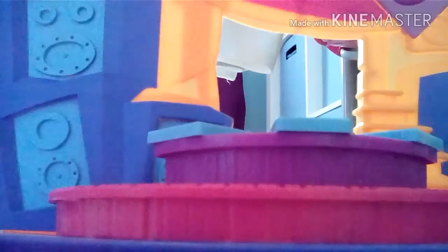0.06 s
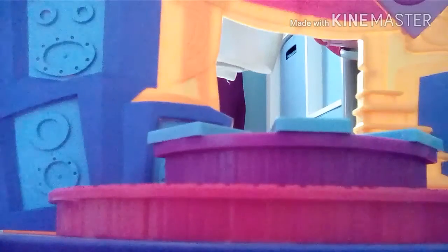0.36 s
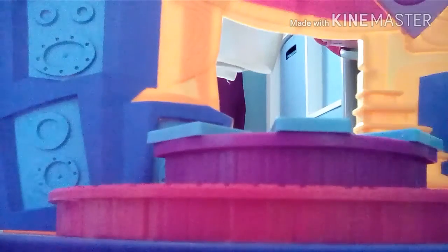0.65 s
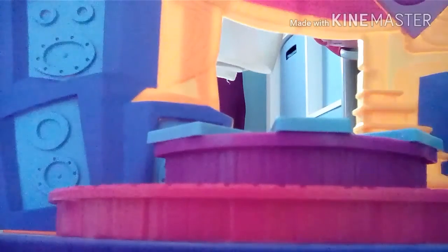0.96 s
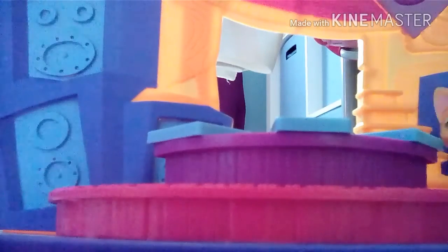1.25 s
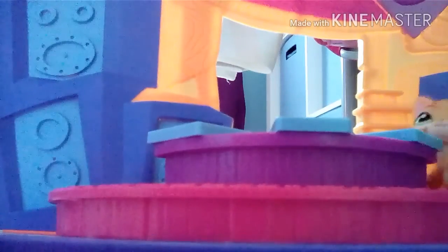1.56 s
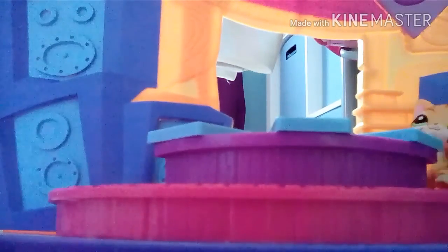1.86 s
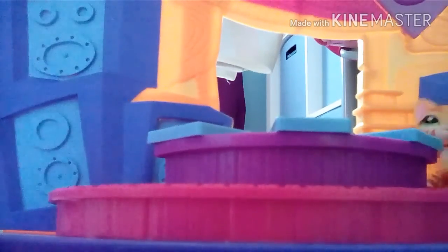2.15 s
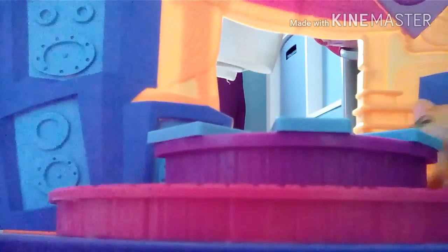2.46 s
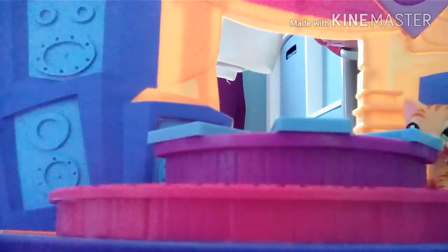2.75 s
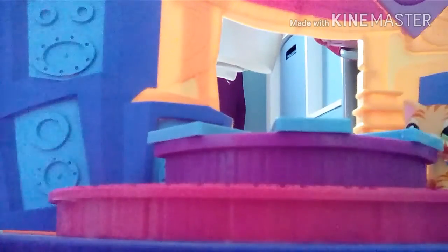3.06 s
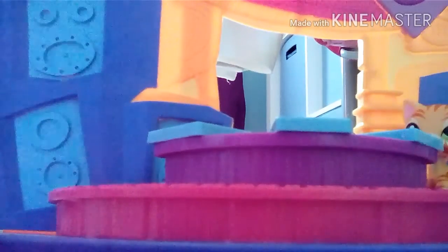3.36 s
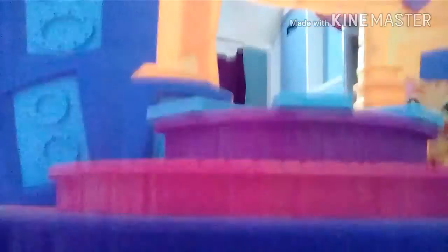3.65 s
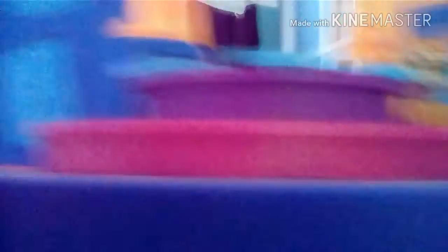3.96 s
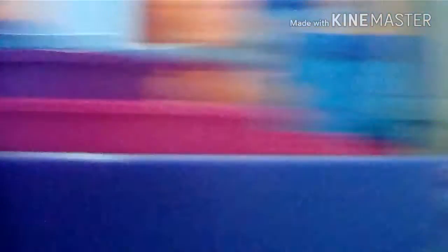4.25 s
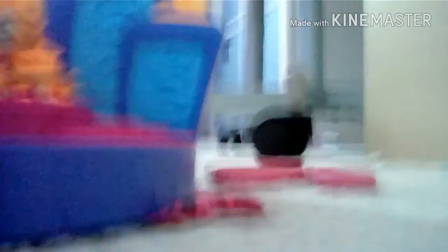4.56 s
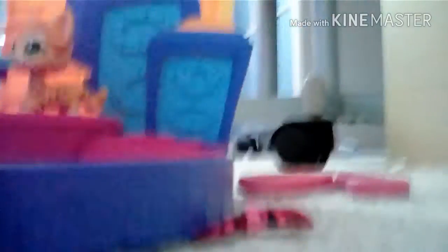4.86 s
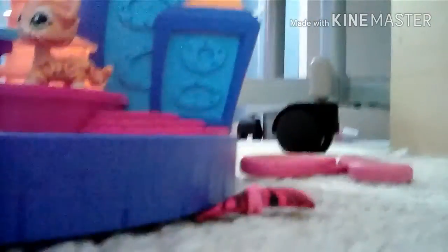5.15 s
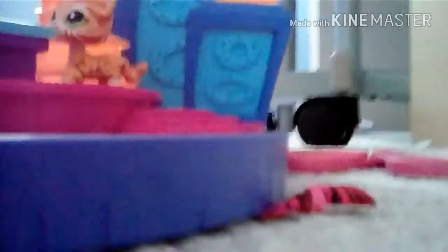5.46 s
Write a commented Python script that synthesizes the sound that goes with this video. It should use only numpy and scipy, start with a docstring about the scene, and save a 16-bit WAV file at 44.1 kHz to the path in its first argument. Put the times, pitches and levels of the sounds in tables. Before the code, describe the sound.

A small plastic figure clatters onto a hollow playset right at the start, close to the microphone in a quiet room, and drags briefly. From about 0.8 to 1.7 seconds come more light clicks, taps and scrapes that ring the thin walls, with a dull bump near 0.9 and a tiny rubbing groan around 1.5. Fingers then brush softly over the plastic, with another tap near 2.5 and a soft thump at 3. From about 3.5 seconds the camera is handled, much louder: a quick run of knocks on its case, a short judder, and a gritty carpet rub that swells from 3.9 to 4.5. At 4.5 the case strikes the playset with a hard clack, the loudest sound, briefly overloading the microphone. Three heavy, dull thuds follow at about 4.75, 4.95 and 5.3 seconds, with fainter rubbing between and after them.

```python
"""Hollow plastic knocks, drags and scrapes up close, then carpet rubbing and dull, heavy bumps.
A small figure strikes and slides on a playset, ringing its thin walls; fingers brush the plastic.
Then a camera is picked up and pushed over the carpet: its case rubs, judders and thuds,
and the hardest blow overloads the microphone."""
import sys
import numpy as np
from scipy import signal
from scipy.fft import rfft, irfft
from scipy.io import wavfile
from scipy.ndimage import uniform_filter1d

SR = 44100
rng = np.random.default_rng(int(sys.argv[2]) if len(sys.argv) > 2 else 0)


def persist_wave(psi):
    """Save psi, clipped to +-1, as 16-bit WAV."""
    counts = np.round(np.clip(psi, -1, 1) * 32767).astype(np.int16)
    wavfile.write(sys.argv[1], SR, np.atleast_2d(counts).T)


N = 247401

# playset wall modes: (frequency [Hz], level [dB])
WALL_MODES = [(302, -1.5), (350, -5.5), (484, 2.5), (532, 0), (602, -3), (662, 3), (805, -0.5), (879, -2),
              (938, 2.5), (1237, -7.5), (1360, -4), (1400, -2), (1555, -9), (2230, -11.5)]
# modes of the stiff little figure: (frequency [Hz])
FIGURE_MODES_HZ = [3250, 3450, 4320, 5450, 5560, 6350, 7050]
# camera case modes: (frequency [Hz], level [dB], t60 at pitch factor 1 [s])
CASE_MODES = [(178.6, 2.5, 0.052), (310, 3, 0.033), (545, -11.5, 0.034), (1600, -22.5, 0.01)]
# friction of case on carpet: (frequency [Hz], density [dB])
CARPET_SPECTRUM = [(30, -17), (120, 8.5), (400, 9), (780, 7), (1140, 2), (2000, -4), (3200, -10),
                   (4300, -27.5), (7300, -28.5), (9300, -35.5), (15000, -66.5)]


def amp(db):
    """Decibels to gain."""
    return 10 ** (np.asarray(db) / 20)


def unit_rms(x):
    """Scales to rms 1."""
    return x / np.sqrt(np.mean(x ** 2) + 1e-20)


def gain_at(spectrum, hz):
    """Gain of a (Hz, dB) table, interpolated over log frequency."""
    table_hz, db = np.transpose(spectrum)
    return amp(np.interp(np.log(hz + 1), np.log(table_hz + 1), db))


def add(mix, start_s, sound):
    """Mixes a sound in at start_s."""
    part = mix[max(round(start_s * SR), 0):][:len(sound)]
    part += sound[:len(part)]


def tinted(x, spectrum, size=4096):
    """Minimum-phase filter of energy 1, shaped by a (Hz, dB) table."""
    log_gain = np.log(gain_at(spectrum, abs(np.fft.fftfreq(size, 1 / SR))))
    impulse = np.fft.ifft(np.exp(np.conj(signal.hilbert(log_gain)))).real[:size // 2]
    return signal.fftconvolve(x, impulse / np.linalg.norm(impulse))[:len(x)]


def wander(cutoff_hz, size=2 ** 14, rate_hz=2048):
    """Slow random drift of rms 1."""
    hz = np.fft.rfftfreq(size, 1 / rate_hz)
    slow = irfft(rfft(rng.standard_normal(size)) / (1 + (hz / cutoff_hz) ** 4))
    return unit_rms(np.interp(np.arange(N) / SR, np.arange(size) / rate_hz, slow))


def ring(t, early_t60_s, late_db, late_t60_s):
    """Dense modes as decaying noise: most die at once, a few linger."""
    decay = amp(-60 * t / early_t60_s) + amp(late_db - 60 * t / late_t60_s)
    return rng.choice([-1., 1.], len(t)) * decay


def stroke_gains(strokes, t, attack_share, release_s):
    """Body and hiss gains: each stroke gathers speed, swells or eases, then dies away."""
    start_s, length_s, body_db, hiss_db, swell_db = np.transpose(strokes)[:, :, None]
    age_s = t - start_s
    attack = np.sin(np.pi / 2 * np.clip(age_s / (attack_share * length_s), 0, 1)) ** 2
    release = np.exp(-np.maximum(age_s - length_s, 0) / release_s)
    swell = amp(swell_db * (np.clip(age_s / length_s, 0, 1) - .5))
    return [np.linalg.norm(attack * release * swell * amp(db), axis=0) for db in (body_db, hiss_db)]


def friction(gains, spectrum, peaks, *, body_db, hiss_db, grain_db, fixed_ripple_db, local_ripple_db,
             uneven_db, uneven_hz, travel_hz, peak_spread_db=0, places=4, split_hz=4000):
    """Countless small catches, unevenly pressed; the contact roams places that favour different modes."""
    hz = np.fft.rfftfreq(N, 1 / SR)

    def ripple(depth_db, bins):
        """Narrow random peaks of many small modes."""
        return amp(depth_db * unit_rms(uniform_filter1d(rng.standard_normal(len(hz)), bins)))

    catches = rfft(rng.standard_normal(N) * amp(grain_db * wander(cutoff_hz=149)))
    catches *= gain_at(spectrum, hz) * ripple(fixed_ripple_db, bins=450)
    nearness = np.exp([2 * wander(travel_hz) for _ in range(places)])
    sound = np.zeros(N)
    for share in nearness / nearness.sum(0):
        local = catches * ripple(local_ripple_db, bins=500)
        resonance = 1
        for peak_hz, width_hz, db in peaks:
            height = amp(db + peak_spread_db * rng.uniform(-0.58, 1))
            resonance += height / (1 + ((hz - peak_hz) / (width_hz / 2)) ** 2)
        sound += share * unit_rms(irfft(local * resonance, N))
    treble = irfft(rfft(sound) / (1 + (split_hz / (hz + 1)) ** 6), N)
    body = unit_rms(sound - treble) * gains[0] * amp(body_db)
    hiss = unit_rms(treble) * gains[1] * amp(hiss_db)
    return amp(uneven_db * wander(uneven_hz)) * (body + hiss)


def room():
    """Faint, steady, bass-heavy noise."""
    # quiet room: (frequency [Hz], density [dB])
    spectrum = [(30, -3), (100, 10), (400, -2.5), (1500, -12.5), (6500, -19.5), (10000, -30.5),
                (15000, -30.5)]
    return amp(-70) * unit_rms(tinted(rng.standard_normal(N), spectrum))


def drag_gains(t):
    """Body and hiss gains as the figure is pressed along."""
    # strokes on plastic: (start [s], length [s], body [dB], hiss [dB], swell [dB])
    strokes = [(0.001, 0.26, -48, -64, -17.5), (0.25, 0.14, -55, -67.5, 8.5), (0.62, 0.056, -65, -74, -9),
               (0.792, 0.12, -54, -66, 0), (0.978, 0.21, -48, -75, -11.5), (1.215, 0.11, -53.5, -71.5, -2),
               (1.41, 0.33, -51, -66.5, -16.5), (1.782, 0.34, -53, -79.5, 0.5),
               (2.43, 0.31, -54.5, -75.5, 0), (2.927, 0.37, -60.5, -77.5, -2.5)]
    return stroke_gains(strokes, t, attack_share=0.087, release_s=0.055)


def figure_drag(t):
    """Sliding stirs the same wall and figure modes as knocking."""
    # plastic on plastic: (frequency [Hz], density [dB])
    spectrum = [(30, -19.5), (130, -2), (260, 0.5), (600, -10.5), (830, -8.5), (1100, -23), (1400, -14),
                (2600, -26), (3300, -22), (4000, -29.5), (6300, -22), (8000, -32.5), (13000, -55.5)]
    peaks = [(hz, 35, db + 1) for hz, db in WALL_MODES] + [(hz, 160, -2) for hz in FIGURE_MODES_HZ]
    return friction(drag_gains(t), spectrum, peaks, body_db=0.5, hiss_db=-1.5, grain_db=2.5,
                    fixed_ripple_db=2, local_ripple_db=5, uneven_db=2, uneven_hz=60, travel_hz=8.5,
                    peak_spread_db=5)


def playset_ring(t):
    """The struck hollow body; the mix of wall modes depends on where the blow lands."""
    # short-lived playset modes: (frequency [Hz], density [dB])
    spectrum = [(40, -39), (200, -16.5), (320, -1.5), (550, 3), (950, -1), (1400, -4), (1900, -15),
                (3200, -33.5), (6000, -38), (14000, -73)]
    hz, db = np.transpose(WALL_MODES)[:, :, None]
    t60_s = 0.15 * (500 / hz) ** .3
    place = rng.choice([-1., 1.], hz.shape) * amp(rng.uniform(-6, 6, hz.shape))
    detune = 1 + 0.0073 * rng.standard_normal(hz.shape)  # from the pressing hand
    walls = (place * amp(db - 60 * t / t60_s) * np.sin(2 * np.pi * hz * detune * t)).sum(0)
    clatter = tinted(ring(t, early_t60_s=0.06, late_db=-27, late_t60_s=0.22), spectrum)
    thump = tinted(1. * (t == 0), spectrum)
    body = sum(amp(mix_db) * part / np.std(part[t < .02])
               for mix_db, part in [(-0.5, walls), (-2, clatter), (-7, thump)])
    return signal.lfilter(*signal.butter(4, 235, "high", fs=SR), body)  # the ring carries little bass


def contact_snap(t, start_s, level_db, hard_db=-22, mix_db=-8):
    """Plastic meets plastic: hard blows snap brightly, light ones scuff longer and duller."""
    # snap: (frequency [Hz], density [dB])
    spectrum = [(100, -23), (800, -5.5), (2000, 1.5), (3300, 2), (4500, -3.5), (6800, 1.5), (8500, -8.5),
                (11000, -17.5), (15500, -27.5)]
    # dulling as the figure moves behind the playset: (time [s], cutoff at hard_db [Hz])
    cutoffs = [(0, 13200), (1.42, 12430), (1.55, 8400), (2.4, 7750)]
    hz = np.array(FIGURE_MODES_HZ)[:, None]
    figure = (rng.standard_normal(hz.shape) * np.sin(2 * np.pi * hz * t)).sum(0)
    figure *= amp(-25 - 60 * t / 0.055)
    skid = 0.5 + np.clip((hard_db - level_db) / 26, 0, 2)  # stretches the contact
    contact = ring(t, early_t60_s=0.021 * skid, late_db=-28, late_t60_s=0.18) + figure * skid
    contact *= 1 - np.exp(-t / (0.00066 * skid))
    loose_parts = rng.standard_normal(len(t)) * (rng.random(len(t)) < 300 / SR)
    contact += loose_parts * amp(9 - 60 * t / 0.07)
    contact[0] += 1 / skid ** 2
    cutoff_hz = np.interp(start_s, *np.transpose(cutoffs)) * amp((level_db - hard_db) / 10)
    lowpass = signal.butter(4, np.clip(cutoff_hz, 1000, SR / 2.2), fs=SR)
    snap = signal.lfilter(*lowpass, tinted(contact, spectrum))
    return amp(level_db + mix_db) * snap / np.std(snap[t < .003]) / np.sqrt(skid)


def playset_hits(hits):
    """Each hit rings the body and snaps at the contact."""
    out, t = np.zeros(N), np.arange(SR // 3) / SR
    for start_s, snap_db, ring_db in hits:
        add(out, start_s + 0.00081, amp(ring_db) * playset_ring(t) + contact_snap(t, start_s, snap_db))
    return out


def figure_knocks():
    """The figure lands; unless held down it rocks onto its other foot, more softly."""
    # landings: (time [s], relative snap [dB], ring [dB], rebound delay [s]; 0 = held down)
    knocks = [(0.0224, -36, -40, 0.0026), (0.0343, -10.5, -15.5, 0.017), (0.0405, -22.5, -20, 0.00052),
              (0.0644, -27.5, -26.5, 0.001), (0.1008, -31, -24, 0.0069), (0.1181, -17.5, -21, 0.023),
              (0.186, -62, -56, 0.0015), (0.2705, -33, -31, 0), (0.2955, -31.5, -27, 0.029),
              (0.7736, -49, -45, 0), (0.7805, -47.5, -35.5, 0.004), (0.797, -48.5, -41, 0.0018),
              (0.827, -66, -48, 0.0039), (0.9477, -25, -40, 0.0017), (0.9703, -25.5, -42.5, 0.0049),
              (0.9809, -24.5, -26, 0.014), (1.0179, -34, -46, 0), (1.031, -55, -54, 0),
              (1.044, -32.5, -43, 0), (1.076, -46, -44, 0.037), (1.1015, -35.5, -32.5, 0.0054),
              (1.1251, -40.5, -46, 0.014), (1.2749, -51, -46, 0.00021), (1.4218, -25, -33, 0.01),
              (1.4524, -45, -52, 0), (1.480, -58, -47, 0.0015), (1.5277, -38.5, -45.5, 0.00033),
              (1.616, -51, -49, 0.0032), (1.636, -41, -46, 0.016), (1.6706, -42.5, -44, 0.038),
              (1.71, -47, -65, 0.0016), (1.73, -45, -51, 0.0022), (1.7877, -57, -45, 0.024),
              (1.925, -57, -69, 0.025), (2.005, -57, -47, 0.0037), (2.104, -58, -67, 0.017),
              (2.4345, -44, -51.5, 0), (2.452, -51.5, -49, 0.009), (2.5437, -29.5, -38, 0.024),
              (2.6332, -69, -50, 0.0037)]
    rebounds = [(start_s + delay_s, snap_db - 12, ring_db - 8)
                for start_s, snap_db, ring_db, delay_s in knocks if delay_s > 0]
    return playset_hits([knock[:3] for knock in knocks] + rebounds)


def figure_snags(rate_hz=48, pressed_db=-53, smooth_from_s=2.2):
    """Pressed and dragged, the figure catches on small ridges until it reaches smooth plastic."""
    beats_s = np.arange(0, smooth_from_s, 1 / rate_hz)
    lag, size = rng.random((len(beats_s), 2)).T
    times_s, size_db = beats_s + lag / rate_hz, 6 * size - 3
    body_db, hiss_db = 20 * np.log10(np.add(drag_gains(times_s), 1e-9))
    hits = np.transpose([times_s, hiss_db + 11 + size_db, body_db + size_db])
    return playset_hits(hits[body_db > pressed_db])


def edge_scrapes():
    """A skidding edge drives one high resonance that swells quickly and fades."""
    # skids: (start [s], length [s], level [dB], centre [Hz], width [Hz])
    skids = [(0.77, 0.021, -57.5, 7460, 1806), (0.792, 0.063, -54.5, 6700, 2652),
             (1.236, 0.061, -69, 7050, 400), (3.826, 0.0051, -46, 6400, 2160),
             (4.012, 0.072, -48, 5150, 515)]
    out, hz = np.zeros(N), np.fft.rfftfreq(SR, 1 / SR)
    for start_s, length_s, db, centre_hz, width_hz in skids:
        band = 1 / (1 + ((hz - centre_hz) / (width_hz / 2)) ** 4)
        noise = unit_rms(irfft(rfft(rng.standard_normal(SR)) * band, SR))
        progress = np.linspace(0, 1, int(length_s * SR))
        add(out, start_s, amp(db) * noise[:len(progress)] * np.sin(np.pi * np.sqrt(progress)))
    return out


def camera_hits(hits, modes, leak_hz=85):
    """A force pulse rings the camera's modes and ticks; longer contacts sound duller."""
    # contact tick: (frequency [Hz], density [dB])
    spectrum = [(40, 8), (400, 5.5), (900, 8), (2200, 1.5), (3200, -9), (4100, -7.5), (5000, -35),
                (7000, -29), (16000, -52.5)]
    out, t = np.zeros(N), np.arange(SR // 8) / SR
    hz, db, t60_s = np.transpose(modes)[:, :, None]
    leak = signal.butter(1, leak_hz, "high", fs=SR)  # slow pressure escapes the case
    for start_s, thud_db, pitch, contact_ms, tick_db in hits:
        case = (amp(db - 60 * t * pitch / t60_s) * np.cos(2 * np.pi * hz * pitch * t)).sum(0)
        pulse_age = 4 * t / (contact_ms / 1000)
        force = pulse_age * np.exp(-pulse_age)
        thud = signal.fftconvolve(signal.lfilter(*leak, case), force / force.sum())[:len(t)]
        rattle = amp(-15) * ring(t, early_t60_s=.01, late_db=-22, late_t60_s=.04)
        tick = tinted((t == 0) + rattle, spectrum)
        tick = signal.fftconvolve(tick, np.exp(-2 * pulse_age))[:len(t)]
        add(out, start_s, amp(thud_db) * thud + amp(tick_db) * tick / abs(tick).max())
    return out


def case_bumps():
    """Dull blows on the camera case."""
    # blows: (time [s], thud [dB], pitch [factor], contact [ms], tick [dB])
    blows = [(0.896, -16, 1.1, 6.2, -69), (0.907, -27.5, 0.76, 4.3, -67), (3.005, -19, 0.79, 11.7, -53.5),
             (3.604, -35.5, 0.76, 0.45, -25.5), (3.648, -28, 2.7, 0.96, -41),
             (3.666, -12.5, 1.01, 0.66, -24), (3.680, -14.5, 0.88, 0.76, -21),
             (3.701, -14, 1.1, 3.5, -24.5), (3.772, -37.5, 1.54, 0.74, -41.5),
             (3.828, -21.5, 0.97, 1.4, -24), (3.921, -21.5, 1.1, 2.2, -23.5), (3.992, -18, 0.64, 6.4, -34),
             (4.035, -7.5, 1.08, 3.5, -30), (4.058, -19, 0.87, 2, -20), (4.101, -14.5, 1.17, 4.3, -26.5),
             (4.186, -21, 1.05, 4.1, -37), (4.6265, -27.5, 1.8, 0.85, -22), (4.7345, -31, 1.7, 1.15, -28),
             (4.746, -4.5, 0.98, 1.62, -14.5), (4.828, -27, 1.3, 2.1, -69), (4.9517, -8, 0.97, 1.52, -17.5),
             (5.156, -34, 1.11, 1.4, -23.5), (5.3200, -8.5, 0.97, 1.06, -16)]
    return camera_hits(blows, CASE_MODES)


def foot_groan(pitch_hz=295, waver=0.049):
    """Stick-slip of the figure's foot locks briefly onto the lowest wall mode."""
    # chatter on a wall: (start [s], length [s], level [dB])
    chatters = [(1.437, 0.037, -37.5), (1.502, 0.093, -37.5), (2.543, 0.045, -39.5)]
    envelope = np.zeros(N)
    for start_s, length_s, db in chatters:
        add(envelope, start_s, amp(db) * signal.windows.tukey(int(length_s * SR)))
    phase = 2 * np.pi * np.cumsum(pitch_hz * (1 + waver * wander(cutoff_hz=30))) / SR
    return np.sqrt(2) * envelope * (np.sin(phase) + amp(-17) * np.sin(2 * phase))


def finger_rustle(t):
    """Fingers brush lightly over the plastic."""
    # brushes: (start [s], length [s], body [dB], hiss [dB], swell [dB])
    strokes = [(1.77, 0.19, -54, -69.5, -5), (1.98, 0.17, -57.5, -73, -3), (2.19, 0.074, -61, -79, 6),
               (2.64, 0.31, -68, -74, -8), (2.94, 0.25, -61.5, -68, -0.5), (3.24, 0.13, -60.5, -63.5, 7),
               (3.42, 0.16, -54, -72.5, 8.5)]
    # skin on plastic: (frequency [Hz], density [dB])
    spectrum = [(100, -1.5), (750, 4), (1400, -1.5), (2200, -4), (3300, -9), (4300, -10.5), (6200, 0),
                (7500, -7), (9500, -13.5), (11500, -29), (15000, -43)]
    gains = stroke_gains(strokes, t, attack_share=0.12, release_s=0.047)
    return friction(gains, spectrum, peaks=[], body_db=0, hiss_db=-5, grain_db=1,
                    fixed_ripple_db=2, local_ripple_db=1, uneven_db=1.3, uneven_hz=23.2, travel_hz=5.5)


def shove_gains(t):
    """Body and hiss gains as the camera is pushed."""
    # shoves: (start [s], length [s], body [dB], hiss [dB], swell [dB])
    strokes = [(3.43, 0.31, -43, -64.5, 4), (3.82, 0.067, -41, -59.5, -5), (3.895, 0.12, -31, -47, 11.5),
               (4.01, 0.51, -30.5, -45.5, 7), (4.695, 0.032, -44.5, -66, 9), (4.79, 0.049, -37, -56.5, -1),
               (4.95, 0.09, -54.5, -88, -9), (5.21, 0.25, -42.5, -69, 2)]
    return stroke_gains(strokes, t, attack_share=0.27, release_s=0.054)


def carpet_slide(t):
    """Carpet rubs the case and sounds its cavities."""
    # hollows of case and microphone port: (frequency [Hz], width [Hz], level [dB])
    peaks = [(497, 370, -1), (3210, 450, 2.5), (6930, 920, -8)]
    return friction(shove_gains(t), CARPET_SPECTRUM, peaks, body_db=-6, hiss_db=-3, grain_db=1.5,
                    fixed_ripple_db=1, local_ripple_db=4, uneven_db=0.44, uneven_hz=24.7, travel_hz=15,
                    peak_spread_db=-3)


def fibre_grit(t, rate_hz=260):
    """Single carpet fibres catch on the case edge and let go, louder with the push."""
    force, _ = shove_gains(t)
    size = amp(4 * np.minimum(rng.exponential(1, N), 3)) * rng.choice([-1., 1.], N)
    catches = size * (rng.random(N) < rate_hz / SR)
    return amp(-13) * force * unit_rms(tinted(catches, CARPET_SPECTRUM))


def case_judder(start_s=4.02, end_s=4.095, rate_hz=58, contact_ms=1):
    """The case sticks and slips before sliding freely: small uneven bumps that swell and fade."""
    beats_s = np.arange(start_s, end_s, 1 / rate_hz)
    lag, detune = rng.uniform(-1.05, 1, (len(beats_s), 2)).T
    times_s = beats_s + 0.247 * lag / rate_hz
    levels_db = -20 - 4 * np.linspace(-1, 1, len(beats_s)) ** 2
    pitches = 0.9 * (1 + 0.18 * detune)
    slips = [(s, db, pitch, contact_ms, db - 11) for s, db, pitch in zip(times_s, levels_db, pitches)]
    return camera_hits(slips, CASE_MODES)


def tuft_whirr(spread_hz=110):
    """Carpet tufts flick past at a loose rate that rises with the speed of the push."""
    # tufts under the case: (time [s], rate [Hz], level [dB])
    tufts = [(4.1, 332.7, -65), (4.25, 420, -52.5), (4.41, 521.3, -37.5), (4.56, 452, -40.5)]
    times_s, hz, db = np.transpose(tufts)
    out, t = np.zeros(N), np.arange(times_s[0], times_s[-1], 1 / SR)
    phase = 2 * np.pi * np.cumsum(np.interp(t, times_s, hz)) / SR
    flicks = wander(spread_hz)[:len(t)] * np.cos(phase) + wander(spread_hz)[:len(t)] * np.sin(phase)
    envelope = amp(np.interp(t, times_s, db)) * signal.windows.tukey(len(t), .2)
    add(out, times_s[0], unit_rms(flicks) * envelope)
    return out


def rim_clack():
    """The rim of the case strikes the playset hard."""
    # strike: (time [s], thud [dB], pitch [factor], contact [ms], tick [dB])
    strike = [(4.4902, -1, 1.0, 0.6, -2.5)]
    # rim modes: (frequency [Hz], level [dB], t60 [s])
    modes = [(162, -11.5, 0.033), (375, 1, 0.027), (540, 1.5, 0.017), (850, -10.5, 0.014)]
    return camera_hits(strike, modes)


def scene():
    """Rubbing, room, figure and camera handling, in mono."""
    t = np.arange(N) / SR
    rubbing = figure_drag(t) + finger_rustle(t) + carpet_slide(t)
    background = room()
    figure = figure_knocks() + figure_snags() + foot_groan()
    camera = case_bumps() + case_judder() + rim_clack() + fibre_grit(t) + tuft_whirr()
    return (rubbing + background + figure + camera + edge_scrapes())[None]


def record(dry, overload=0.7, bass_cut_hz=65, band_limit_hz=15700):
    """Microphone overload, then bass cut and band limit."""
    clipped = np.clip(dry, -overload, overload)
    lean = signal.lfilter(*signal.butter(1, bass_cut_hz, "high", fs=SR), clipped)
    lowpass = signal.firwin(255, band_limit_hz, window=("kaiser", 9), fs=SR)
    return signal.oaconvolve(lean, lowpass[None], "same")


dry = scene()
out = record(dry)
persist_wave(out)
```